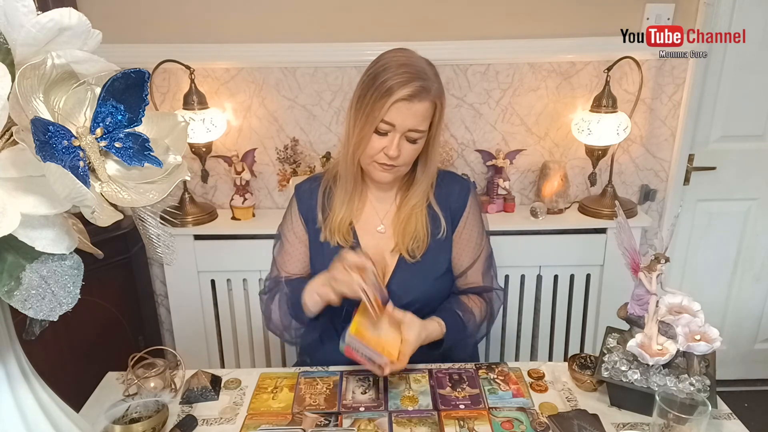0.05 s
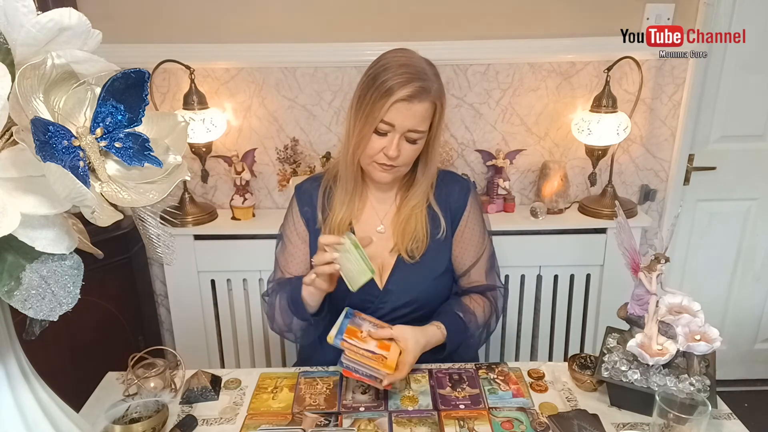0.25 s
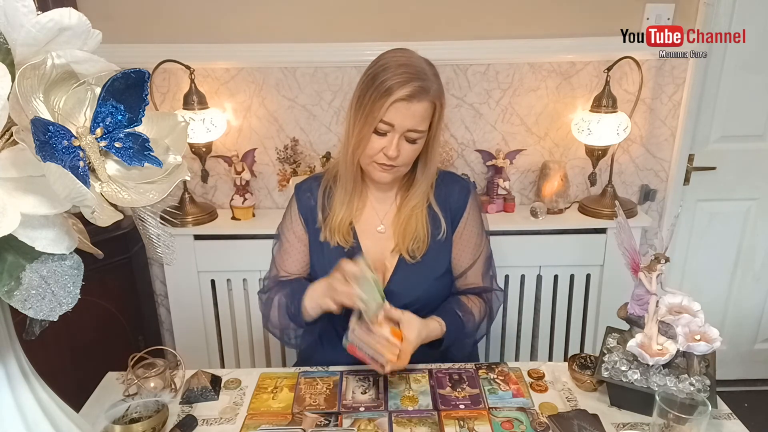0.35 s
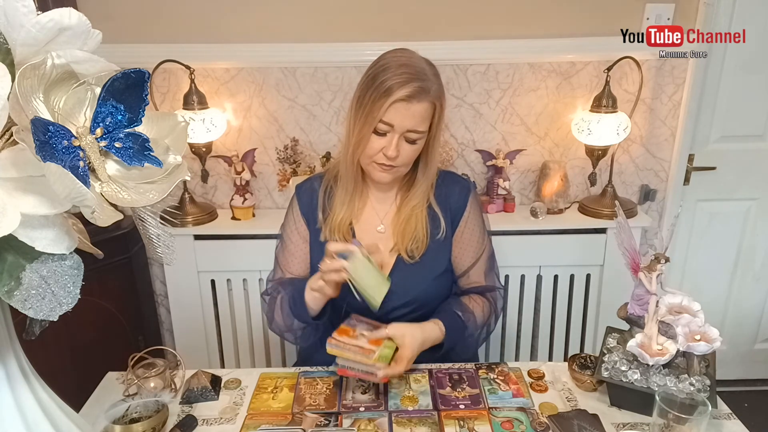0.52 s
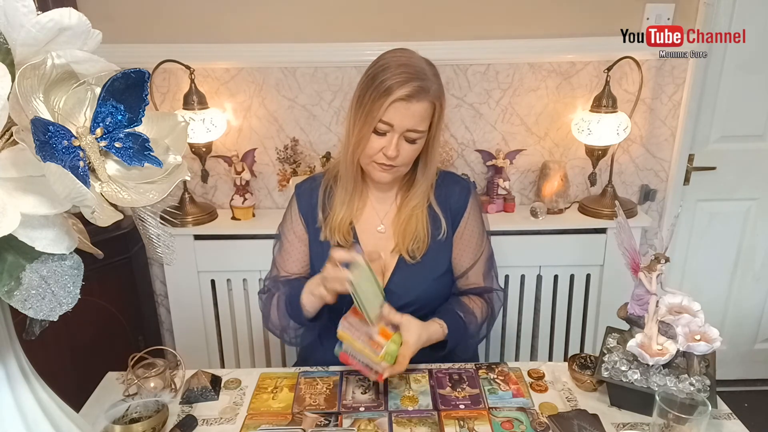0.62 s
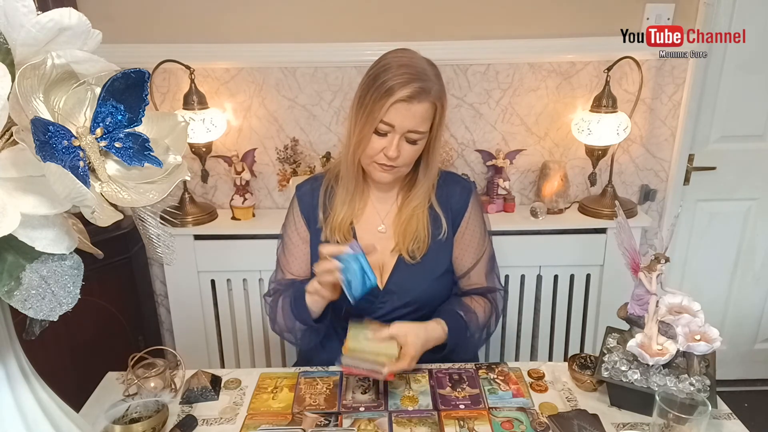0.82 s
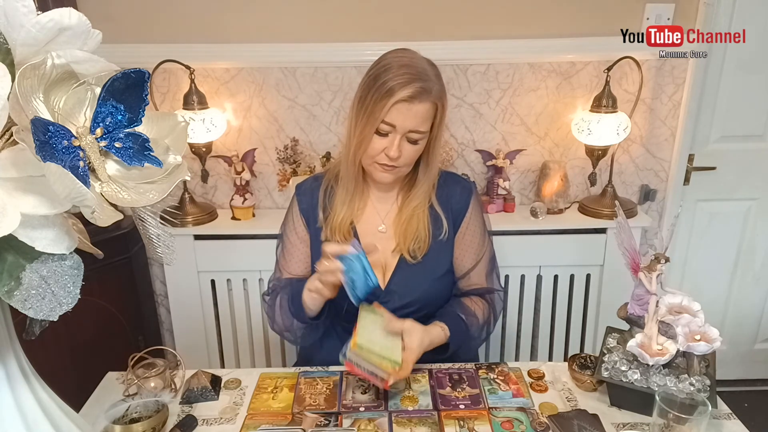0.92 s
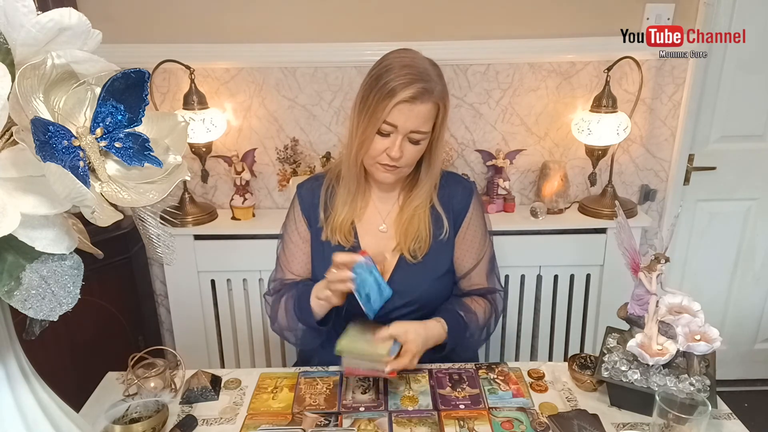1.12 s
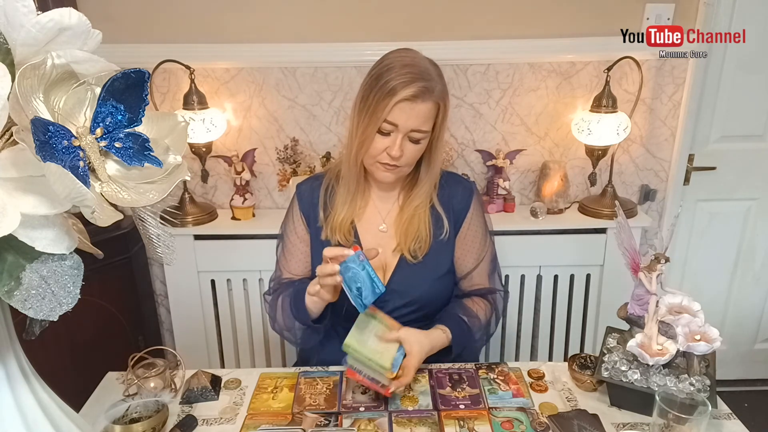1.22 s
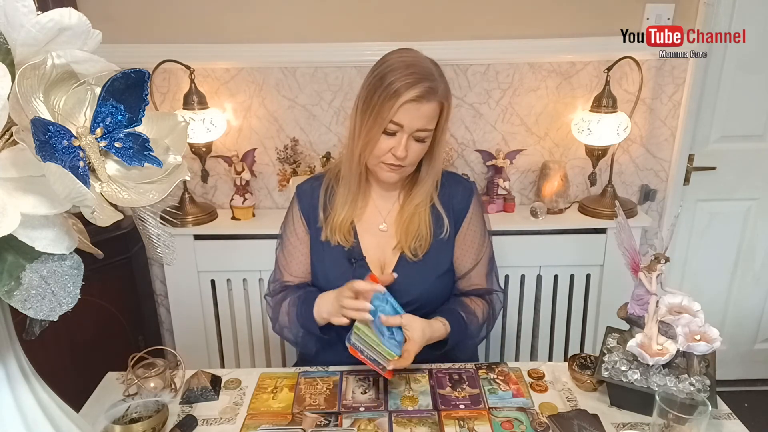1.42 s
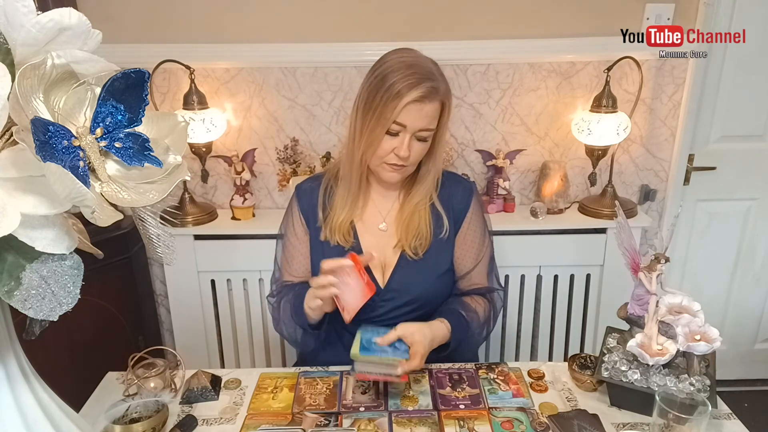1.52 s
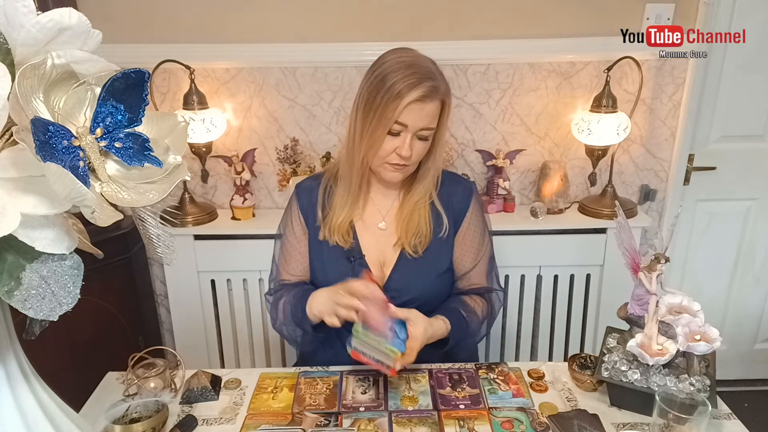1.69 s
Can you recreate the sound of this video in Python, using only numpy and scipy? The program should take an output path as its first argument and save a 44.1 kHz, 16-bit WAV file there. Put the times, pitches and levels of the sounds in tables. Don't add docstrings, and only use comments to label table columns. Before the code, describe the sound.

A deck of stiff cards shuffled by hand, sharp snaps and light rustles in a small room

```python
import sys
import numpy as np
from scipy import signal
from scipy.fft import rfft, irfft
from scipy.io import wavfile
from scipy.ndimage import uniform_filter1d

SR = 44100
rng = np.random.default_rng(int(sys.argv[2]) if len(sys.argv) > 2 else 0)


def wav_record(signal):
    frames = np.transpose(np.atleast_2d(signal))
    bounded = np.clip(frames, -1, 1)
    quanta = np.round(bounded * 32767).astype(np.int16)
    wavfile.write(sys.argv[1], SR, quanta)


def boost_factor(decibels):
    exponent = np.asarray(decibels, float) / 20
    return 10 ** exponent


N = 77175
LEAD_S = 0.12
LONG = N + int(LEAD_S * SR)

# f/Hz, level/dB [per Hz]
HUM_SPECTRUM = [(40, -39), (63, 13.5), (85, -0.5), (200, -0.5), (437, -7), (1190, -19), (4000, -26.5),
                (16000, -38.5)]
HUM_DB = -51.5

# t/s, ring level/dB, ring f/Hz, edge tick level/dB, tick f/Hz
CLAPS = [(-.07, -11, 673, -14, 3020), (-.05, -20.5, 450, -10, 1007), (.2098, -8, 588, -14.5, 2540),
         (.2111, -11, 777, -14, 1118), (.2170, -11.5, 1330, -13.5, 4470), (.2188, -5.5, 1150, -14, 2680),
         (.2337, -7.5, 4700, -0.5, 5870), (.4797, -17, 2190, -15, 3330), (.481, -12.5, 2264, -37, 2820),
         (.7815, -20, 1900, -39, 2650), (.7838, -5, 2310, -12, 10100), (.7855, -11, 1830, -7, 11100),
         (.7975, -7.5, 3330, -8, 2300), (.8055, -13.5, 1070, -11, 3620), (.8078, -11, 2770, -1.5, 7370),
         (1.4765, -27, 2040, -51, 2390), (1.0934, -18, 3390, -17, 1750), (1.4932, -19.5, 1206, -21, 6850),
         (1.6753, -33, 1310, -20, 6000), (1.7105, -59, 2400, -29, 3460), (1.7125, -28.5, 2380, -43, 1300),
         (1.7165, -29, 1110, -30.5, 2500), (.7988, -26, 3260, -29, 1900), (1.6731, -36, 1320, -30, 9000),
         (1.7203, -30, 1530, -26, 8000), (.8125, -26, 1870, -44, 3000), (.2333, -13.5, 1490, -18, 3080)]
CLAP_CYCLES, CLAP_TICK_CYCLES = 2.7, 3.16
# t/s, ring level/dB, ring f/Hz, edge tick level/dB, tick f/Hz
TAPS = [(.0785, -23.5, 1420, -29, 9050), (.081, -16, 1270, -20.5, 10000), (.2045, -16, 3080, -23, 8100),
        (.2445, -30, 3530, -33, 4970), (.3677, -19.5, 1510, -18.5, 12000), (.3847, -13.5, 1470, -42, 5040),
        (.4646, -14, 1600, -17.5, 4050), (.4875, -26, 3300, -60, 3520), (.581, -48, 2940, -56, 6600),
        (.6562, -37, 2940, -32, 8700), (.6612, -19.5, 1440, -20, 9400), (.6655, -27, 1316, -55, 4100),
        (.6775, -26.5, 1870, -41, 8060), (.6886, -27.5, 1550, -32, 3560), (.7675, -19, 1720, -26, 3000),
        (.9937, -21, 1480, -31.5, 8050), (1.0075, -28, 1370, -34, 6960), (1.0757, -13, 1590, -20, 3570),
        (1.3146, -34.5, 1200, -46, 9000), (1.3468, -25.5, 1560, -21.5, 3600),
        (1.3605, -30, 1520, -38, 9100), (1.0104, -15.5, 1420, -31.5, 4140), (1.503, -28, 1460, -40, 5000),
        (.0995, -25, 1300, -43, 2301), (.822, -34, 1500, -20, 7100)]
TAP_CYCLES, TAP_TICK_CYCLES = 1.46, 2.4
RING_TILT = 0.45
BLUNT_HZ = 3600
# f/Hz, level/dB [per Hz]
CRACKLE_SPECTRUM = [(500, -41), (2500, 21), (5000, 9), (9000, 8.5), (16000, -7)]
SPRAY_DB, SPRAY_DB_PER_OCTAVE, SPRAY_MS = -5.5, 4, 0.45
CHATTER = 0.3

# f/Hz, t60/s, level/dB
ROOM_TAIL = [(90, 0.25, -7.5), (200, 0.34, -34), (450, 0.37, -4), (1080, 0.35, -11), (2520, 0.35, -9),
             (3700, 0.39, -12), (6000, 0.45, -12), (12000, 0.32, -12)]
ROOM_ONSET_S = 0.011

# t/s [start], length/s, hiss level/dB, swell [share of length], rustle level/dB
SLIDES = [(0.078, 0.045, -36, 0.12, -38), (0.106, 0.092, -41, 0.85, -43), (0.2, 0.011, -33, 0.64, -23),
          (0.364, 0.058, -41.5, 0.11, -38), (0.404, 0.06, -47, 0.38, -50.5),
          (0.442, 0.046, -36, 0.62, -34.5), (0.659, 0.063, -42, 0.028, -37.5),
          (0.694, 0.12, -40.5, 0.71, -41.5), (0.778, 0.012, -55, 0.41, -17.5), (0.793, 0.17, -42, .08, -31),
          (0.233, 0.15, -46.5, 0.074, -34.5), (0.975, 0.087, -50.5, 0.27, -43.5),
          (1.02, 0.055, -46.5, 0.46, -49), (1.058, 0.047, -39.5, 0.46, -39), (1.159, 0.029, -57, 0.79, -66),
          (1.315, 0.055, -53, 0.072, -51.5), (1.346, 0.065, -53.5, 0.086, -41),
          (1.372, 0.12, -40, 0.9, -49.5), (1.569, 0.026, -59, 0.62, -76), (1.673, 0.021, -35, 0.11, -37),
          (1.701, 0.053, -47.5, 0.25, -36.5)]
# f/Hz, level/dB [per Hz]
HISS_SPECTRUM = [(1500, -4), (3500, 4.5), (7000, 5), (11000, 5.5), (16000, 3)]
# f/Hz, level/dB [per Hz]
RUSTLE_SPECTRUM = [(400, 4), (700, -2), (1400, 0.5), (2500, -5), (4500, -14)]
GRIT_DB, PATCHY_DB = 1, 0.5

# t/s, level/dB, f/Hz
THUMPS = [(0.0988, -22, 118), (0.2074, -9, 300), (0.221, -19, 90), (0.2347, -16, 200), (0.3719, -22, 294),
          (0.3904, -19.5, 144), (0.3838, -29, 487), (0.39, -28.5, 450), (0.367, -32.5, 450),
          (0.0833, -28, 295), (0.105, -32, 200), (.9932, -31, 483), (.4795, -31, 304), (0.2431, -24.5, 298),
          (0.4732, -22.5, 169), (0.4948, -27.5, 84), (0.486, -27, 200), (0.6657, -23, 347),
          (0.6789, -23, 200), (0.6893, -25.5, 263), (0.7662, -16.5, 443), (0.77, -21, 177),
          (0.8052, -15, 400), (0.81, -17.5, 104), (0.998, -28, 118), (1.0096, -21.5, 398),
          (1.0157, -19.5, 123), (1.091, -24, 310), (1.0965, -26, 110), (1.350, -26.5, 177),
          (1.363, -28, 129), (1.495, -21, 310), (1.5023, -28.5, 200), (1.677, -30, 200),
          (1.718, -27.5, 170)]
THUMP_WIDTH, REBOUND_DB = 0.17, -3.5

# t/s [start], length/s, level/dB, f/Hz
RASPS = [
    (0.19, 0.027, -35, 2900),
    (0.24, 0.0037, -14.5, 2410),
    (0.47, 0.14, -38.5, 2600),
    (1.078, .009, -34, 5400),
    (1.13, 0.11, -52, 2900),
    (1.348, 0.033, -53, 3600),
    (1.489, 0.015, -36.5, 2750),
    (1.7, 0.014, -37, 1750),
    (.469, 0.014, -28, 1600),
]
RASP_WIDTH, RASP_GRAIN_DB = 0.55, 3.5

# t/s, f/Hz, level/dB
MOTOR_WHINE = [
    (.9, 13100, -90),
    (.92, 12750, -78),
    (0.952, 12100, -75),
    (.99, 11700, -72),
    (1.11, 11300, -69),
    (1.18, 11330, -70),
    (1.2, 11500, -70),
    (1.22, 11250, -80),
    (1.25, 10650, -78),
    (1.31, 10560, -84),
]

# t/s, f/Hz, level/dB
SQUEAK = [
    (1.425, 6180, -45),
    (1.449, 7340, -38.5),
    (1.465, 9730, -39.5),
    (1.469, 10980, -25.5),
    (1.4723, 12200, -42),
    (1.473, 13700, -27),
    (1.481, 16300, -71),
]

SIDE_DB, SIDE_HZ = -2, 400
TOP_HZ = 15900


def colour(x, points):
    hz, db = np.array(points, float).T
    f = np.log(np.maximum(np.fft.rfftfreq(len(x), 1 / SR), 1))
    corners = np.log(np.r_[hz[0] / 4, hz, hz[-1] * 4])
    gain_db = np.interp(f, corners, np.r_[db[0] - 30, db, db[-1] - 30])
    y = irfft(rfft(x) * boost_factor(gain_db), len(x))
    return y / np.sqrt(np.mean(y ** 2))


def bell(x, hz, step):
    f = np.log(np.maximum(np.fft.rfftfreq(len(x), 1 / SR), 1) / hz)
    return irfft(rfft(x) * np.clip(1 - np.abs(f) / step, 0, 1), len(x))


def add(track, s, sound):
    i = int((s + LEAD_S) * SR)
    track[i:i + len(sound)] += sound[:LONG - i]


def timeline():
    return np.arange(LONG) / SR - LEAD_S


def glide(points):
    s, hz, _ = np.array(points).T
    return np.sin(2 * np.pi * np.cumsum(np.interp(timeline(), s, hz)) / SR)


def glide_db(points):
    s, _, db = np.array(points).T
    return np.interp(timeline(), s, db, -120, -120)


def hum():
    return boost_factor(HUM_DB) * colour(rng.standard_normal(LONG), HUM_SPECTRUM)


def ring(hz, cycles):
    t = np.arange(900) / SR
    return np.sin(2 * np.pi * hz * t) * np.exp(-t * hz / cycles)


def slaps(table, cycles, tick_cycles):
    out, t = np.zeros(LONG), np.arange(900) / SR
    for s, db, hz, tick_db, tick_hz in table:
        body_rattle, edge_rattle = 1 + CHATTER * 5 * uniform_filter1d(rng.standard_normal((2, 900)), 25)
        body = ring(hz, cycles * (min(hz, 2400) / 1400) ** RING_TILT) * body_rattle
        tick = ring(tick_hz, tick_cycles * min(1, BLUNT_HZ / tick_hz)) * edge_rattle
        spray = colour(rng.standard_normal(900), CRACKLE_SPECTRUM) * np.exp(-t / (SPRAY_MS / 1000))
        spray_db = SPRAY_DB + SPRAY_DB_PER_OCTAVE * np.log2(min(tick_hz, 6000) / 6000)
        spray *= boost_factor(spray_db) / np.abs(spray).max() * 2
        add(out, s, boost_factor(db) * body + boost_factor(tick_db) * (tick + spray))
    return out


def room(x):
    t = np.arange(int(0.6 * SR)) / SR
    at, t60, db = np.array(ROOM_TAIL).T
    noise = rng.standard_normal(len(t)) * 0.03
    tail = 0
    for hz in 60 * 1.4 ** np.arange(17):
        band_db = np.interp(np.log(hz), np.log(at), db)
        band_t60 = np.interp(np.log(hz), np.log(at), t60)
        tail = tail + bell(noise, hz, np.log(1.4)) * boost_factor(band_db - 60 * t / band_t60)
    onset = np.clip(t / ROOM_ONSET_S, 0, 1) ** 2
    return signal.fftconvolve(x, tail * onset)[:LONG]


def flicker(k):
    smooth = uniform_filter1d(rng.standard_normal(LONG), k)
    return np.sqrt(k) * uniform_filter1d(smooth, k // 2)


def friction(points):
    out, noise = 0, colour(rng.standard_normal(LONG), points)
    for hz in 200 * 1.5 ** np.arange(12):
        out = out + bell(noise, hz, np.log(1.5)) * boost_factor(PATCHY_DB * flicker(260))
    return out * boost_factor(GRIT_DB * flicker(60))


def slides():
    t, out = timeline(), 0
    hiss, rustle = friction(HISS_SPECTRUM), friction(RUSTLE_SPECTRUM)
    for s, length, db, share, rustle_db in SLIDES:
        peak = s + np.clip(share, 0.03, 0.97) * length
        shape = np.interp(t, [s, peak, s + length], [0, 1, 0]) ** 1.22
        out = out + shape * (boost_factor(db) * hiss + boost_factor(rustle_db) * rustle)
    return out


def thumps():
    out, t = np.zeros(LONG), np.arange(3000) / SR
    for s, db, hz in THUMPS:
        push = np.exp(-((t * hz - 0.27) / THUMP_WIDTH) ** 2)
        suck = np.exp(-((t * hz - 0.736) / (1.44 * THUMP_WIDTH)) ** 2)
        add(out, s, boost_factor(db) * (push - boost_factor(REBOUND_DB) * suck))
    return out


def rasps():
    t, out = timeline(), 0
    grain = 6 * uniform_filter1d(rng.standard_normal(LONG), size=36)
    noise = rng.standard_normal(LONG) * boost_factor(RASP_GRAIN_DB * grain)
    for s, length, db, hz in RASPS:
        band = bell(noise, hz, RASP_WIDTH)
        shape = np.interp(t, [s, s + 0.052 * length, s + length], [0, 1, 0])
        out = out + boost_factor(db) * band / band.std() * shape
    return out


def whine():
    return glide(MOTOR_WHINE) * boost_factor(glide_db(MOTOR_WHINE) + 1)


def squeak():
    waver = uniform_filter1d(rng.standard_normal(LONG), 22) * 2.7
    return glide(SQUEAK) * (waver + 0.14) * boost_factor(glide_db(SQUEAK))


def scene():
    cards = slaps(CLAPS, CLAP_CYCLES, CLAP_TICK_CYCLES) + slaps(TAPS, TAP_CYCLES, TAP_TICK_CYCLES)
    cards = cards + slides() + thumps() + rasps() + squeak()
    mid = cards + room(cards) + hum() + whine()
    bass = signal.butter(3, [95, SIDE_HZ], "band", fs=SR, output="sos")
    side = signal.sosfilt(bass, room(cards) + hum() + boost_factor(-44) * cards) * boost_factor(SIDE_DB)
    side = side + boost_factor(-42) * bell(mid, 13300, 0.7)
    return np.array([mid + side, mid - side])[:, -N:]


def roll_off(x):
    return signal.sosfilt(signal.butter(12, 17030, fs=SR, output="sos"), x)


def record(dry):
    x = signal.sosfilt(signal.bessel(4, 62, "high", fs=SR, output="sos", norm="mag"), dry)
    x = signal.sosfilt(signal.butter(2, 38, "high", fs=SR, output="sos"), x)
    x = np.tanh(x ** 3 / 2 + x)
    x = signal.sosfilt(signal.ellip(6, 0.3, 30, TOP_HZ, fs=SR, output="sos"), x)
    x = signal.sosfilt(signal.ellip(8, 0.3, 70, TOP_HZ + 1050, fs=SR, output="sos"), x)
    return roll_off(x)


dry = scene()
out = record(dry)
wav_record(out)
```